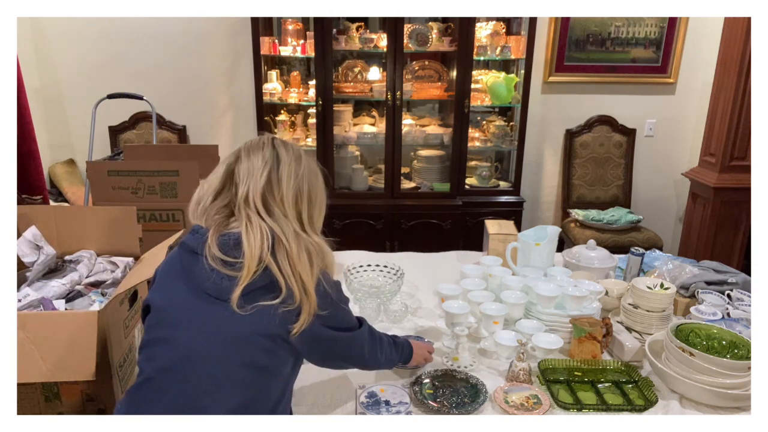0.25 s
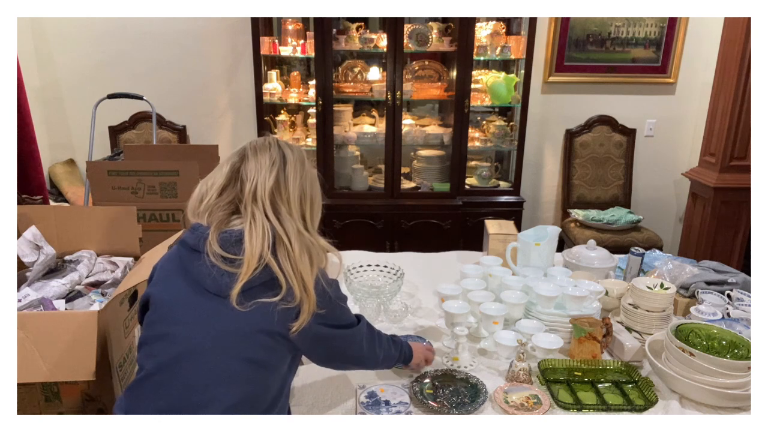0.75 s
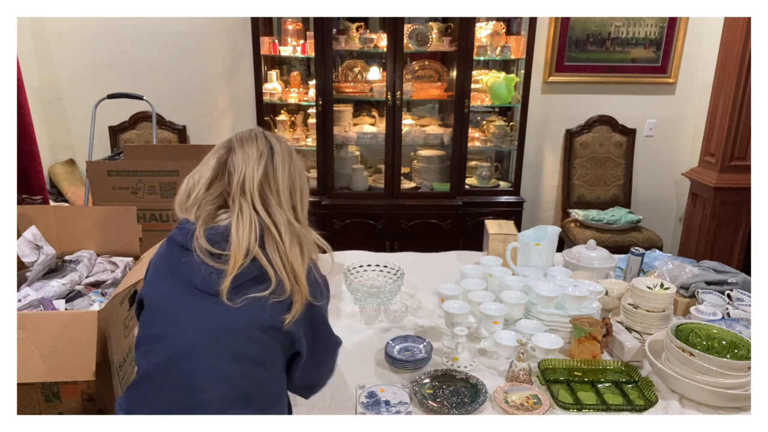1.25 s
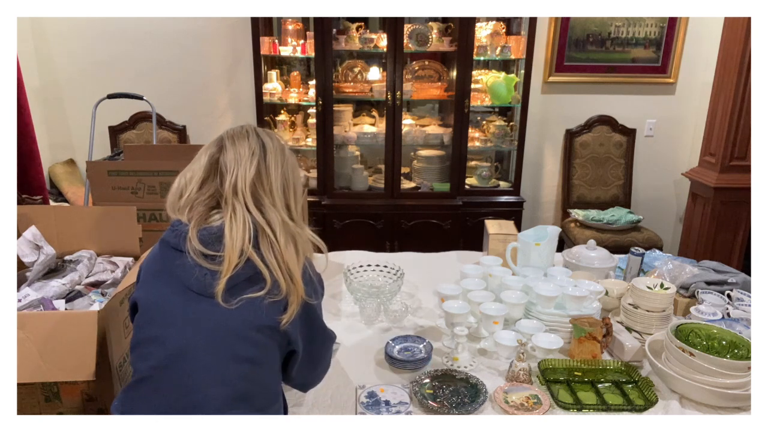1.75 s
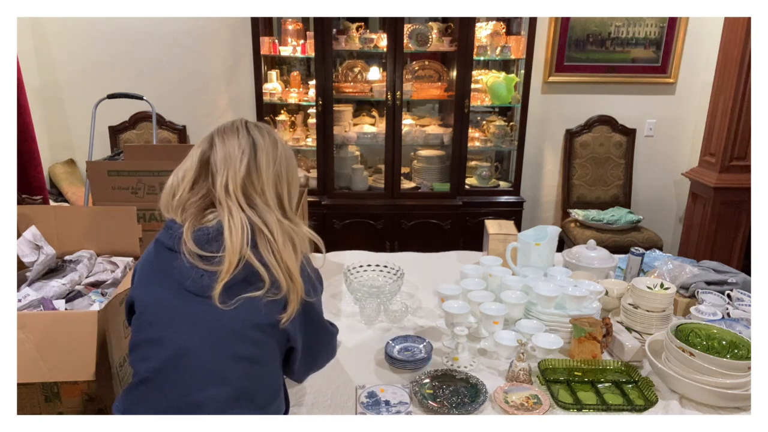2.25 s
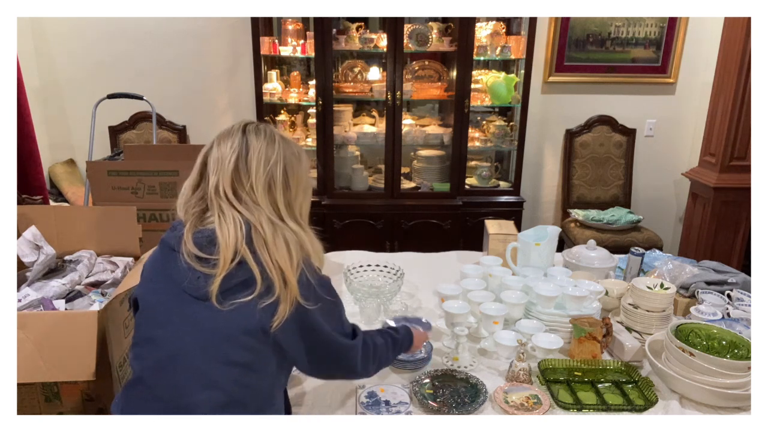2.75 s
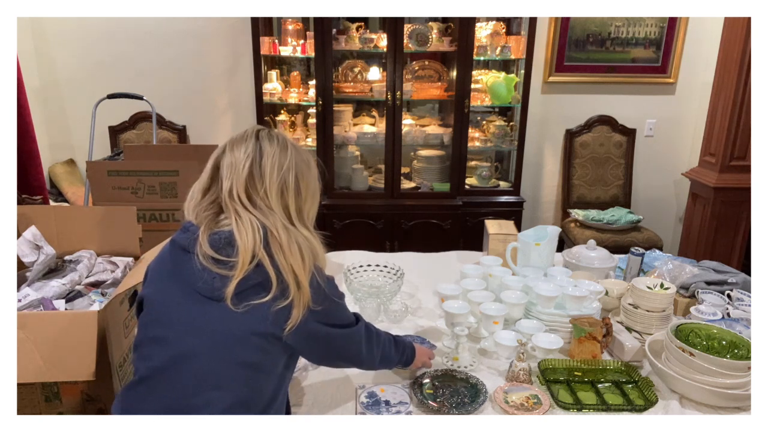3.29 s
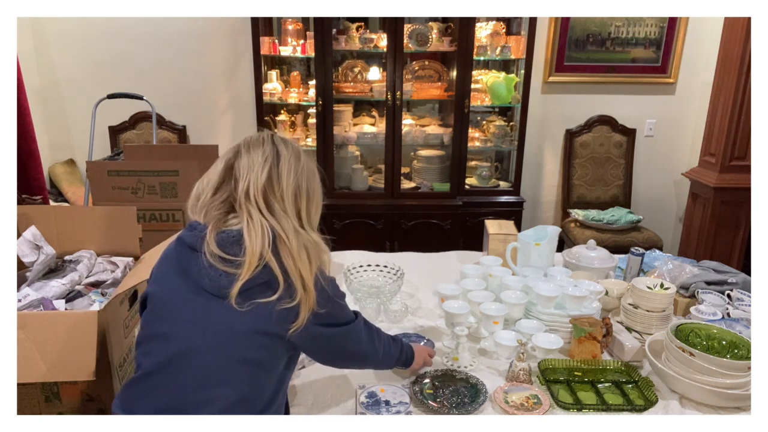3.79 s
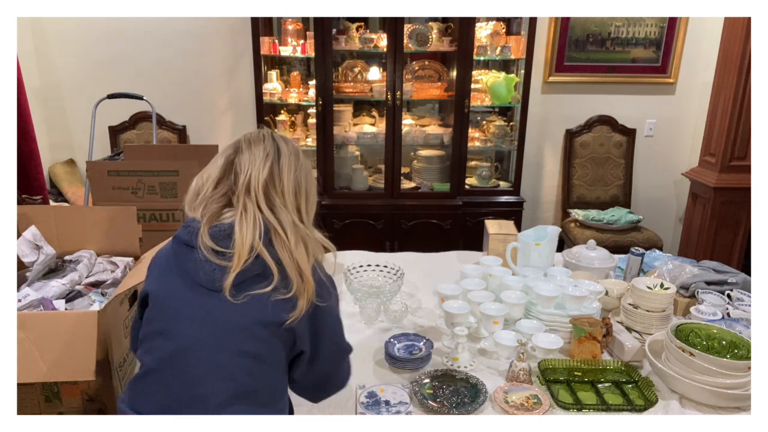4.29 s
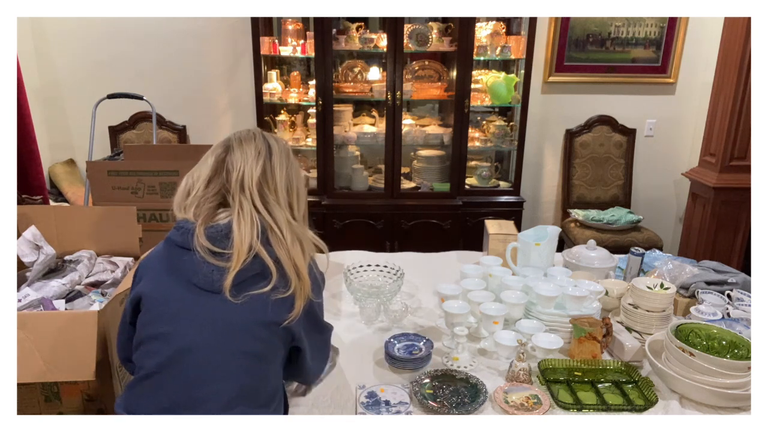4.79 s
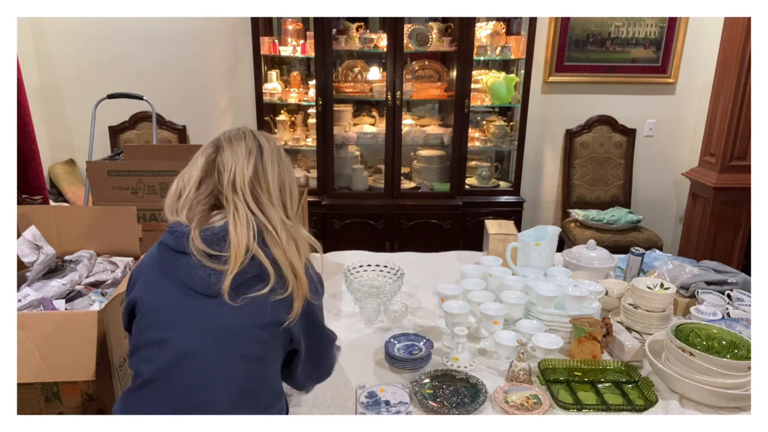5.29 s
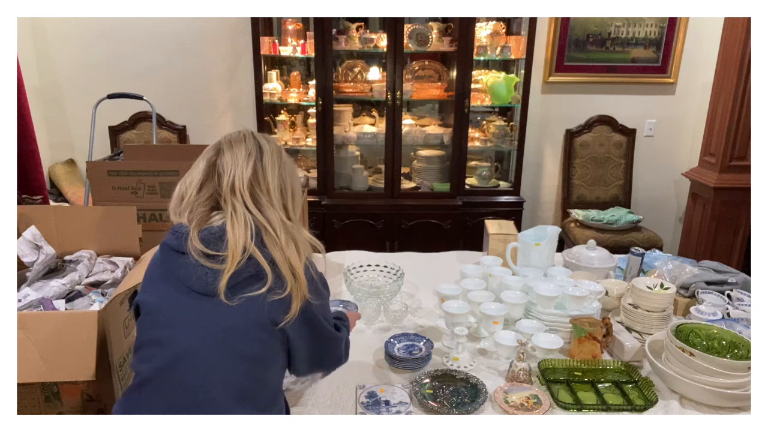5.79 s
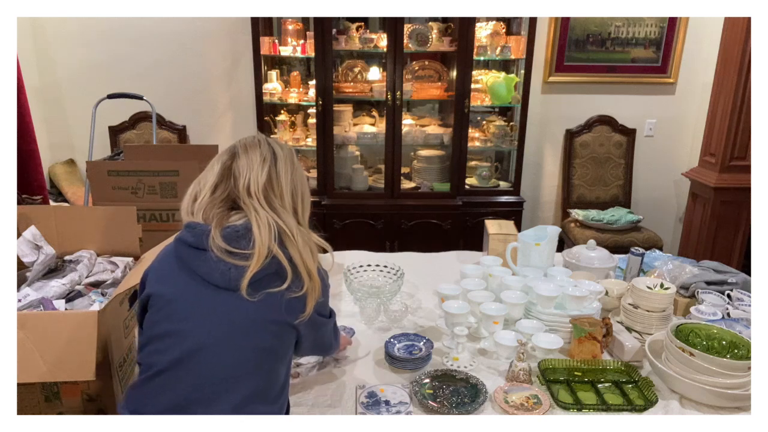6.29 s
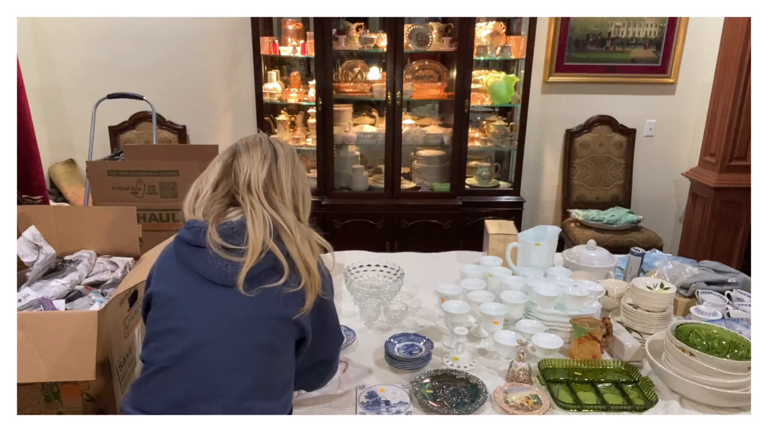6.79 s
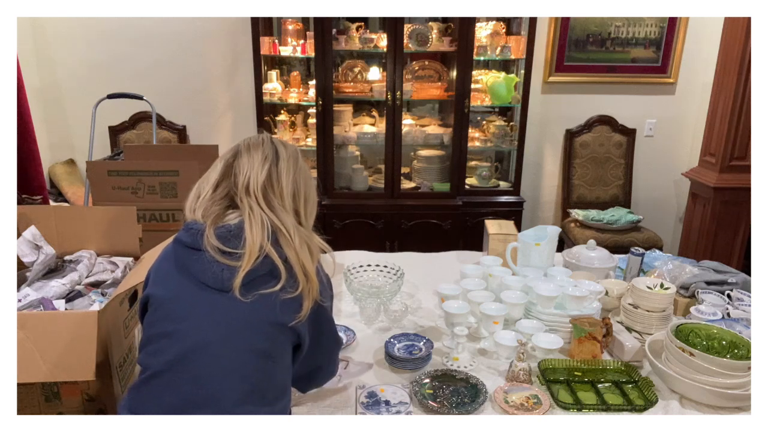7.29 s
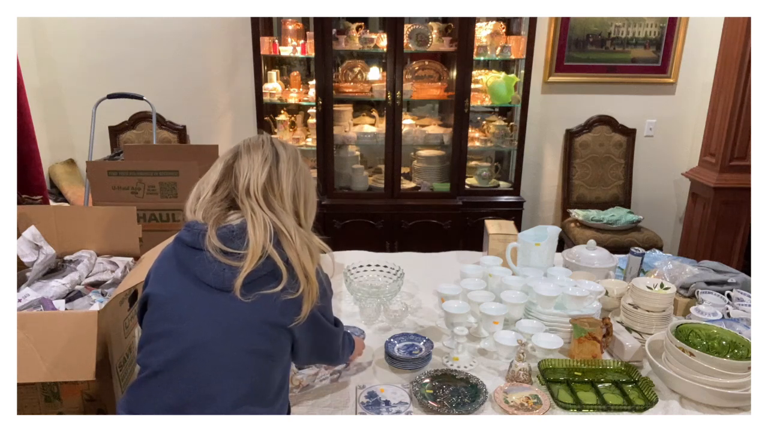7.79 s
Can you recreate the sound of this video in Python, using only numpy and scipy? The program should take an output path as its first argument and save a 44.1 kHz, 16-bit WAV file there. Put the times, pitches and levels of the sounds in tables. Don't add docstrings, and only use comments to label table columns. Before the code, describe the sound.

A hard, bright clink of small china bowls opens, bouncing and rocking to rest within half a second. Newspaper rustles and snaps, thinning to near quiet around two and a half seconds. Softer, damped bowl knocks come between three and four seconds, then steadier paper crackle with quiet floor thuds. A gritty ceramic scrape closes. A few metres from a small stereo recorder in a furnished room, with low engine hum outside.

```python
import sys
import numpy as np
from scipy import signal
from scipy.fft import rfft, irfft, next_fast_len
from scipy.io import wavfile

SR = 44100
rng = np.random.default_rng(int(sys.argv[2]) if len(sys.argv) > 2 else 0)


def pcm_store(signal):
    levels = np.round(np.clip(np.atleast_2d(signal), -1, 1) * 32767)
    wavfile.write(sys.argv[1], SR, levels.astype(np.int16).T)


def gain_from_decibels(decibels):
    exponent = np.asarray(decibels, float) / 20
    return 10 ** exponent


N = 355004


def rms_one(x):
    return x / np.sqrt(np.mean(np.square(x)) + 1e-20)


def in_time(rows):
    s, *columns = np.transpose(rows)
    return [np.interp(np.arange(N) / SR, s, c) for c in columns]


def at_hz(points, hz):
    table = np.array(points, float)
    return np.interp(np.log(hz + 1), np.log(table[:, 0] + 1), table[:, 1])


def coloured(x, points):
    hz = np.linspace(0, SR / 2, 1025)
    taps = signal.firwin2(2047, hz, gain_from_decibels(2 * at_hz(points, hz)), fs=SR)
    return signal.fftconvolve(x, signal.minimum_phase(taps))[:N]


def band(x, low_hz, high_hz):
    edges_hz = [low_hz, min(high_hz, .45 * SR)]
    return signal.sosfilt(signal.butter(2, edges_hz, "band", fs=SR, output="sos"), x)


def drift(rate):
    r = np.exp(-80 * np.pi * rate / SR)
    slow = signal.lfilter([1], [1, -2 * r, r * r], rng.standard_normal(N // 40 + 2002))[2000:]
    return np.interp(np.arange(N) / 40, np.arange(len(slow)), rms_one(slow))


def ring(clicks, hz, t60):
    r, w = gain_from_decibels(-60 / (t60 * SR)), 2 * np.pi * hz / SR
    return signal.lfilter([0, np.sin(w)], [1, -2 * r * np.cos(w), r * r], clicks + 1e-18)


def grains(per_s, spread_db, size=N):
    sizes = gain_from_decibels(spread_db * np.minimum(rng.exponential(1, size), 5)) * rng.choice([-1, 1], size)
    return sizes * (rng.random(size) < per_s / SR) / np.sqrt(per_s)


def clinks(hits, modes, level_db, tick_db, clatter_db, longest_s, clatter_s=0.16):
    s, peak_db, hard_db = np.transpose(hits)
    start, size = round(s[0] * SR), round((s[-1] - s[0] + .6) * SR)
    at = np.round(s * SR).astype(int) - start
    luck_db = rng.normal(0, 2.5, (len(at), len(modes)))
    rattle = grains(2500, spread_db=2.0, size=size) * 50
    fading = gain_from_decibels(-60 / (clatter_s * SR))

    def blows(db):
        clicks = np.zeros(size)
        clicks[at] = gain_from_decibels(peak_db + db)
        return clicks, gain_from_decibels(clatter_db) * rattle * signal.lfilter([0, 1], [1, -fading], clicks)

    blow, clatter = blows(tick_db)
    sound = 0.28 * band(blow, 500, 9000)
    sound += 0.47 * band(clatter, 500, 5000)
    sound += 0.21 * band(clatter, 4600, 9000)
    sound += 0.12 * band(clatter, 9900, 16000)
    for k, (hz, db, t60) in enumerate(modes):
        blow, clatter = blows(db + level_db + hard_db * np.log2(hz / 2500) + luck_db[:, k])
        t60 = np.clip(t60, .02, longest_s)
        pair = ring(blow, hz, t60) + .5 * ring(blow, hz * 1.015, .6 * t60)
        damped = ring(blow + clatter, hz, .018)
        sound += (pair + damped) * (-1) ** k
    out = np.zeros(N)
    out[start:start + size] = band(band(sound, 670, 19000), 300, 19000)
    return out


# (time [s], peak level [dB], hardness of the high modes [dB per octave])
FIRST_HITS = [
    (0.0774, -37, -11),
    (0.1018, -3.5, -0.5),
    (0.1165, -13.5, 4.5),
    (0.1262, -12.5, -3),
    (0.1448, -23, 3),
    (0.189, -14, -5),
    (0.1965, -22.5, -1),
]
# (frequency [Hz], level [dB], T60 [s])
FIRST_MODES = [(1050, -16.5, 0.2), (1450, 0, 0.067), (1647, -7.5, 0.23), (2370, -3.5, 0.3),
               (2570, -7, 0.39), (2837, -1.5, 0.33), (3531, -29.5, 0.3), (3917, -3.5, 0.12),
               (4030, -8, 0.23), (4215, -10.5, 0.24), (4350, -23, 0.5), (5970, -1, 0.2), (5990, 0, 0.24),
               (5540, -21, 0.11), (6660, -22, 0.25), (6970, -14.5, 0.33), (7740, -22.5, 0.24),
               (8260, -27, 0.34), (8540, -9, 0.17), (10900, -32, 0.21), (7270, -23.5, 0.11),
               (11400, -15.5, 0.13), (12100, -25, 0.15), (12330, -38, 0.2)]


def first_stacking():
    return clinks(FIRST_HITS, FIRST_MODES, level_db=-19.0, tick_db=14.5, clatter_db=-11.0, longest_s=0.82)


# (time [s], peak level [dB], hardness [dB per octave])
SECOND_HITS = [
    (3.3112, -21.5, 0),
    (3.3178, -25.5, 2.2),
    (3.3345, -33, 0.82),
]
# (frequency [Hz], level [dB], T60 [s])
SECOND_MODES = [(960, -27.5, 0.5), (1657, -1.5, 0.081), (2480, -17, 0.43), (2630, -23, 1.4),
                (2713, -50, 5.0), (2860, -26, 0.21), (4300, -36, 1.3), (4253, -28, 5.0), (4700, -27, 0.2),
                (6160, -21, 0.67), (3170, -25, 0.1), (7900, -31, 0.22), (11200, -25, 0.1), (8600, -38, 0.1)]


def second_stacking():
    return clinks(SECOND_HITS, SECOND_MODES, level_db=-7.5, tick_db=12.5, clatter_db=-8.0,
                  longest_s=0.033, clatter_s=0.14)


# (time [s], peak level [dB], hardness [dB per octave])
ROCKING_HITS = [
    (0.2782, -19, 0.058),
    (0.2845, -18, 1.6),
]
# (frequency [Hz], level [dB], T60 [s])
ROCKING_MODES = [(1660, 1, 0.03), (1790, -0.5, 0.019), (2470, -8.5, 0.042), (2700, -14.5, 0.2),
                 (3925, -4, 0.22), (4380, -8, 0.03), (5620, -24.5, 0.21), (5870, -9, 0.25),
                 (6550, -22.5, 0.1), (6700, -22, 0.12), (7630, -22, 0.15), (8740, -11.5, 0.051),
                 (11570, -22, 0.1), (13440, -26.5, 0.08)]
# (time [s], peak level [dB], hardness [dB per octave])
RESTING_HITS = [
    (0.3313, -20.5, -0.5),
    (0.3372, -18.5, -9),
    (0.341, -29, -5),
    (0.3555, -28, 1.5),
    (0.3625, -32, 0),
    (0.3685, -32.5, -7),
    (0.379, -45, 2.5),
]
# (frequency [Hz], level [dB], T60 [s])
RESTING_MODES = [(1415, -15, 0.04), (1660, -8, 0.031), (2430, -15.5, 0.085), (2692, -10, 0.082),
                 (4000, -22.5, 0.084), (4630, -14.5, 0.065), (5830, -10, 0.17), (5950, -11, 0.3),
                 (6720, -15.5, 0.15), (7600, -11, 0.15), (8660, -8.5, 0.061), (11000, -20, 0.17),
                 (12420, -32.5, 0.15), (13510, -31.5, 0.15)]


def settling_bowl():
    rocking = clinks(ROCKING_HITS, ROCKING_MODES, level_db=-10.5, tick_db=9.0, clatter_db=-9.0,
                     longest_s=0.36, clatter_s=0.048)
    return rocking + clinks(RESTING_HITS, RESTING_MODES, level_db=-7.5, tick_db=7.5, clatter_db=-5.5,
                            longest_s=0.3, clatter_s=0.11)


# (time [s], peak level [dB], hardness [dB per octave])
TIPPING_HITS = [
    (3.3545, -27.5, 0),
    (3.3595, -36, 0),
    (3.368, -34.5, 0),
    (3.372, -42, 0),
]
# (frequency [Hz], level [dB], T60 [s])
TIPPED_MODES = [(1000, -9.5, 0.03), (1660, -11, 0.06), (2810, -8, 0.074), (3160, -13, 0.068),
                (4180, -15, 0.04), (6300, -14, 0.04), (7940, -24, 0.05), (11440, -26, 0.06)]
# (time [s], peak level [dB], hardness [dB per octave])
HELD_HITS = [
    (3.1495, -30.5, 0),
    (3.178, -28, 0),
    (3.19, -39, 0),
    (3.2035, -29.5, 0),
    (3.2197, -43, 0),
    (3.6085, -33, 0),
    (3.6283, -29.5, 0),
    (3.6776, -30.5, 0.0047),
]
# (frequency [Hz], level [dB], T60 [s])
HELD_MODES = [(836, -10, 5.0), (1120, -7.5, 0.4), (1465, -3.5, 5.0), (1650, -2, 5.0), (2520, -6, 0.38),
              (3260, -32, 5.0), (4500, -26, 0.23)]
# (time [s], peak level [dB], hardness [dB per octave])
THIRD_HITS = [
    (3.8855, -21.5, 0),
    (3.895, -37, 0.0057),
]
# (frequency [Hz], level [dB], T60 [s])
THIRD_MODES = [(1435, 1, 0.21), (1676, -3, 0.13), (2450, -1.5, 0.13), (3030, -13, 0.72), (3140, -28, 5.0),
               (3190, -3, 0.19), (3930, -26, 0.34), (5160, -28, 5.0), (6370, -14, 0.26), (7510, -37, 0.18),
               (7950, -7, 0.05), (8450, -33, 5.0)]


def handled_bowls():
    sound = clinks(TIPPING_HITS, TIPPED_MODES, level_db=-9.0, tick_db=9.5, clatter_db=-5.5,
                   longest_s=0.12, clatter_s=0.079)
    sound += clinks(HELD_HITS, HELD_MODES, level_db=-15.5, tick_db=-0.5, clatter_db=-3.0, longest_s=0.042)
    sound += clinks(THIRD_HITS, THIRD_MODES, level_db=-17.5, tick_db=15.0, clatter_db=-8.5, longest_s=0.13)
    return sound


# (time [s], level [dB], hardness [dB])
SLIDE_STROKES = [
    [(7.79, -49, 3), (7.803, -31.5, -15), (7.831, -18, -12), (7.834, -16.5, -12.5), (7.879, -18.5, -3.5),
     (7.884, -29, 3.5)],
    [(7.91, -33, -1), (7.948, -24.5, -11), (7.98, -17, -14), (7.998, -27.5, -4.5), (8.05, -34, -14.5)],
]
# (time [s], peak level [dB])
JOLTS = [(7.8021, -13.5), (7.8137, -11), (7.8321, 0), (7.8414, 1), (7.8548, -1), (7.8687, -2.5),
         (7.861, -1), (7.8745, -15), (7.8803, -10), (7.9568, -15), (7.9699, -13), (7.9822, -25),
         (7.987, -26), (8.004, -16)]
# (frequency [Hz], width [Hz], level [dB], change on the second stroke [dB])
SLIDING_MODES = [(861, 30, -11, -8), (1370, 34, 1.5, -2), (1557, 26, 3.5, -11.5), (1730, 46, -8, -9),
                 (2332, 32, 0, 3.5), (2432, 44, -1.5, -7.5), (3080, 140, -13, -2.5), (3570, 44, -8, 1.5),
                 (3790, 45, -4.5, -7.5), (4600, 52, -14, 2.5), (4820, 37, -9, 0), (5180, 30, -15, 0),
                 (5910, 37, -10, 5), (6050, 21, -12, 3.5), (6360, 15, -10.5, -1), (6520, 38, -8.5, -2.5),
                 (7100, 29, -17.5, -2), (1190, 62, -20.5, 19), (8080, 40, -15.5, 0), (8530, 110, -16, -6),
                 (9100, 22, -22, 2), (2830, 17, -12, -4), (10970, 20, -14.5, -5.5), (3450, 19, -10.5, 10),
                 (12400, 55, -22, -5), (12800, 31, -21, -4), (13240, 90, -28.5, -8), (2590, 26, -11, 11),
                 (1040, 24, -13.5, 8)]


def slide():
    start = round(7.8 * SR)
    level_db, hard_db = (c[start:] for c in in_time(np.concatenate(SLIDE_STROKES)))
    size = N - start
    second_stroke = np.arange(start, N) > 7.93 * SR
    stutter = grains(4000, spread_db=1.5)[start:] * gain_from_decibels(level_db)
    jolts = np.zeros(size)
    for s, db in JOLTS:
        jolts[round(s * SR) - start] = gain_from_decibels(db - 33.5)
    sound = gain_from_decibels(39.0) * band(stutter + jolts, 900, 8400)
    for k, (hz, width, db, later_db) in enumerate(SLIDING_MODES):
        push = stutter * rng.normal(1, 1.0, size) + jolts
        if hz > 3200:
            push = push * gain_from_decibels(hard_db + 9.0)
        wander_db = np.interp(np.arange(size), np.linspace(0, size, 24), rng.normal(0, 2.5, 24))
        push = push * gain_from_decibels(wander_db + later_db * second_stroke)
        sign = (-1) ** k
        sound += ring(push, hz, 2.0 / max(width, 5)) * gain_from_decibels(db) * width * sign
        if hz < 9000:
            sound += ring(push, hz, 0.007) * gain_from_decibels(db + 3.0) * width * sign
    table_top = gain_from_decibels(-31.5) * rms_one(band(stutter + jolts, 153, 400))
    bowl = band(band(rms_one(sound), 650, 15000), 330, 15000)
    out = np.zeros(N)
    out[start:] = (bowl + table_top) * np.sqrt(np.mean(gain_from_decibels(2 * level_db))) * gain_from_decibels(-2.0)
    return out


# (time [s], hold [s], crumpling level [dB], sheet flap relative level [dB], crispness
# relative level [dB])
PAPER_TUGS = [(0.127, 0.31, -43, -7, -3), (0.423, 0.13, -46, -4, -1.5), (0.672, 0.051, -44, 0, -0.5),
              (0.856, 0, -37, -2.5, -0.4), (0.967, 0.079, -45, -2.5, 0.3), (1.214, 0.091, -40, -1, 0.3),
              (1.35, 0.19, -46, -3.5, 0), (1.542, 0.12, -45, -2, -1), (1.698, 0.0021, -41, -1, 1),
              (1.864, 0.072, -52.5, -3.5, 0), (2.058, 0, -49.5, -3, 0.2), (2.23, 0.019, -54, -3, -1),
              (2.524, 0.062, -64, -3.3, 1.5), (2.828, 0.04, -53, -1, 0), (2.992, 0.059, -48.5, -4.5, 0),
              (3.151, 0.098, -51.5, 0.5, 0.5), (3.35, 0.19, -49.5, -2.5, -0.5),
              (3.623, 0.067, -47.5, -3, -1),
              (3.884, 0.093, -49.5, -2, -2), (4.053, 0.059, -48.5, -0.5, 0), (4.247, 0.2, -42, -3, 1),
               (4.41, 0.038, -44, -7, -0.5), (4.515, 0.029, -45, -0.5, -0.5),
               (4.614, 0.036, -44.5, -2.5, 1), (4.72, 0.024, -42.5, -1, 0.5), (4.999, 0.079, -47.5, -4, -1),
               (5.15, 0.074, -47.5, -2.5, -0.5), (5.375, 0.04, -49, -2, 1), (5.566, 0.17, -49, -1.5, 0.1),
               (5.777, 0.031, -45, -2.5, 0.5), (5.871, 0.037, -44, -5, 2), (6.018, 0.078, -47, -0.5, -1.9),
               (6.19, 0.068, -47.5, -3.5, 1), (6.39, 0.049, -50.5, -3.5, 0.5), (6.562, 0.0056, -52, -2, -1),
               (6.68, 0.052, -47, 1.5, 0), (6.794, 0.061, -49.5, -5.5, 1), (6.999, 0.024, -45.5, -2.5, 1),
               (7.114, 0.15, -51, -2.5, 0), (7.434, 0.1, -57.5, 0.1, -0.5), (7.586, 0.13, -50.5, -2, -0.5),
               (7.688, 0.11, -50.5, -3, 2)]


def tugs():
    rise_db_per_s, fall_db_per_s, paper_db = 149.5, 124, 3.5
    power, t = 0, np.arange(0, N + 40, 40) / SR
    for s, hold, db, flap_db, crisp_db in PAPER_TUGS:
        away_db = rise_db_per_s * np.maximum(s - t, 0) + fall_db_per_s * np.maximum(t - s - hold, 0)
        parts_db = np.array([[0], [flap_db], [crisp_db]])
        power = power + gain_from_decibels(2 * (paper_db + db - away_db + parts_db))
    return [np.interp(np.arange(N) / SR, t, np.sqrt(part)) for part in power]


# (frequency [Hz], level [dB per Hz])
PAPER_SPECTRUM = [(120, -5.5), (250, -3.5), (520, 6), (720, 9), (900, 10), (1700, -8.5), (2500, -5),
                  (4000, -1.5), (6000, -9), (8000, -14), (10000, -17), (13000, -21), (16000, -27)]
# (frequency [Hz], width [Hz], level [dB])
ROOM_MODES = [(543, 53, 2.5), (867, 126, 0)]


def paper():
    crumple_gain, flap_gain, crisp_gain = tugs()
    clumps = gain_from_decibels(0.93 * drift(5.2) + 0.83 * drift(11))
    ends = [coloured(grains(2600, spread_db=1.0) * clumps, PAPER_SPECTRUM) for end in range(2)]
    crackle = np.array(ends)
    answer = sum(ring(crackle, hz, 4.3 / max(width, 8)) * gain_from_decibels(db) * width for hz, width, db in ROOM_MODES)
    crackle = crackle + gain_from_decibels(-11.0) * np.std(crackle) * rms_one(answer)
    flap = rms_one(band(crackle, 130, 980)) * gain_from_decibels(2 * drift(12))
    body = rms_one(band(crackle, 1262, 3140)) * gain_from_decibels(1.2 * drift(24))
    crisp = rms_one(band(crackle, 3890, 18000)) * gain_from_decibels(-4.5 + 1.0 * drift(23))
    return flap_gain * flap + crumple_gain * body + crisp_gain * crisp


# (time [s], peak level [dB], pitch [Hz])
FOLD_SNAPS = [(0.504, -29, 840), (0.843, -33, 457), (0.953, -29, 537), (1.009, -40, 860),
              (1.144, -43.5, 1040), (1.262, -31.5, 1330), (1.679, -31, 2230), (1.837, -49, 1050),
              (1.894, -45.5, 1530), (2.067, -43.5, 1340), (2.209, -46.5, 1082), (2.76, -53.5, 773),
              (2.846, -46, 1996), (2.98, -39, 861), (4.169, -38, 958), (4.507, -36.5, 1210),
              (4.607, -36.5, 1660), (4.64, -41, 1060), (5.503, -40.5, 770), (5.625, -40, 1080),
              (5.888, -38, 800), (6.056, -39, 870), (6.634, -41, 778), (6.905, -42.5, 1120),
              (6.993, -48.5, 530), (7.05, -40, 840), (7.437, -47, 1340), (7.7, -37.5, 640)]


def snaps():
    out, age = np.zeros(N), np.arange(4000) / SR
    for s, db, hz in FOLD_SNAPS:
        at = round(s * SR)
        burst = rng.standard_normal(len(age)) * np.minimum(age / .001, 1) * gain_from_decibels(-60 * age / .06)
        crack = gain_from_decibels(-27.5) * rms_one(band(burst, 0.97 * hz, 9000))
        out[at:at + len(age)] += gain_from_decibels(db - 14.5) * (rms_one(band(burst, 0.53 * hz, 1.44 * hz)) + crack)
    return out


# (time [s], peak level [dB], T60 [s])
CREASE_TEARS = [(0.86, -37.5, .1), (1.22, -48, .1), (1.526, -42, 0.089), (1.689, -36.5, .08),
                (2.067, -49, .06), (2.2079, -60, .08), (2.756, -55, .1), (2.974, -47.5, .06),
                (3.4506, -40.5, .15), (3.469, -38, .1), (3.6008, -54, .08), (3.8404, -63, .08),
                (4.235, -41.5, .1), (4.6347, -35, 0.078), (4.9762, -53, .08), (5.1696, -43, .05),
                (5.343, -49, .1), (5.627, -54.5, 0.066), (5.8857, -29.5, 0.13), (6.21, -44, .08),
                (6.3, -39.5, 0.16), (6.636, -55, 0.071), (6.9407, -50.5, .06), (6.96, -41.5, 0.1),
                (7.6986, -32, 0.28)]


def creases():
    out, age = np.zeros(N), np.arange(6000) / SR
    shape = (len(CREASE_TEARS), len(age))
    spray = rng.standard_normal(shape) * gain_from_decibels(3.3 * rng.standard_normal(shape))
    for (s, db, t60), noise in zip(CREASE_TEARS, spray):
        at = round(s * SR)
        bright = rms_one(band(noise, 4500, 15000)) + gain_from_decibels(-5.5) * rms_one(band(noise, 1400, 4500))
        out[at:at + len(age)] += gain_from_decibels(db - 9 - 60 * age / np.clip(t60, .02, .3)) * bright
    return out


# (time [s], hum level [dB])
ENGINE_HUM = [
    (0.0, -50.5),
    (1.66, -52.5),
    (1.84, -55),
    (2.35, -55),
    (2.62, -52.5),
    (3.94, -55.5),
    (4.69, -52.5),
    (5.04, -58),
    (7.44, -75),
    (8.05, -64),
]
# (time [s], peak level [dB], frequency [Hz])
FLOOR_THUDS = [
    (5.099, -42, 110),
    (5.3, -38.5, 99),
    (5.531, -37, 75),
    (5.601, -41.5, 133),
    (5.68, -42, 95),
    (6.475, -41.5, 157),
    (6.493, -31, 90),
    (6.52, -42, 70),
    (6.55, -40, 81),
    (6.591, -43, 101),
]


def rumble():
    hum_db, = in_time(ENGINE_HUM)
    deep_db = -57.5 + 0.34 * (hum_db + 47.5)
    white = rng.standard_normal((2, N))
    out = gain_from_decibels(hum_db + 5.5) * rms_one(band(ring(white[0], 91.3, 0.24), 57, 125))
    out += gain_from_decibels(deep_db) * rms_one(band(white[1], 48, 72))
    out += gain_from_decibels(deep_db - 7.0) * rms_one(band(band(white[0], 36, 48), 36, 60))
    for s, db, hz in FLOOR_THUDS:
        push, at = np.zeros(SR // 2), round(s * SR)
        push[0] = gain_from_decibels(db - 1.0)
        out[at:at + len(push)] += band(ring(push, hz, 0.15), 46, 230)
    return out


# (frequency [Hz], level [dB per Hz])
AIR_SPECTRUM = [(90, -4), (150, 2), (220, -7.5), (300, 2), (500, -22), (1000, -21), (2500, -36.5),
                (8000, -28.5), (12500, -33.5), (16000, -39)]
# (time [s], level [dB])
AIR_SWAY = [(0, -3.5), (2.3, -2.5), (2.4, 7), (2.47, 1), (2.55, 5), (2.6, 5.5), (2.65, 1), (2.69, -8),
            (2.725, 2), (2.76, 2), (8.05, -0.5)]


def still_air():
    sides = [coloured(rng.standard_normal(N), AIR_SPECTRUM) for side in range(2)]
    tone = gain_from_decibels(-57) * rms_one(sides)
    low = gain_from_decibels(0.25 * (in_time(ENGINE_HUM)[0] + 58.0)) * band(tone, 94, 475)
    return low + gain_from_decibels(in_time(AIR_SWAY)[0]) * band(tone, 344, 19000)


# (frequency [Hz], T60 [s])
REVERBERATION = [(100, 0.35), (1000, 0.39), (4000, 0.3), (12000, 0.11)]
# (frequency [Hz], left-right likeness [0-1])
PORT_LIKENESS = [(30, .9), (90, .96), (170, .86), (350, .84), (700, .25), (1600, .45), (3000, .3),
                 (4000, .1), (5800, .2), (7200, .8), (9500, .95), (16000, .95)]
# (frequency [Hz], left minus right [dB])
PORT_LEVEL = [(60, -0.5), (180, -2), (550, 0.5), (1650, -0.5), (4970, -2), (15000, 1)]
# (frequency [Hz], left lead [rad])
PORT_PHASE = [(0, -.1), (400, -.1), (700, .9), (3000, .7), (5500, 1.8), (6100, .1), (7350, 0),
              (16000, -9.9)]


def room(x, wet_db, gap_s, sideways, wide_db):
    size = SR // 2
    age, edges = np.arange(size) / SR, 40 * 2 ** np.arange(0, 9.1)
    white, tails = rng.standard_normal((2, size)), 0
    for low, high in zip(edges, edges[1:]):
        t60 = at_hz(REVERBERATION, np.sqrt(low * high))
        tails = tails + band(white, low, high) * gain_from_decibels(-60 * age / t60)
    tails = tails * np.clip(age / gap_s, 0, 1)
    tails = gain_from_decibels(wet_db) * tails / np.sqrt(np.sum(tails ** 2, axis=1, keepdims=True))
    tails[1] *= gain_from_decibels(wide_db)
    tails[0, 0] += 1
    length = next_fast_len(N + size)
    hz = np.arange(length // 2 + 1) * SR / length
    direct = [[0], [-1j * sideways]]
    paths = (rfft(tails, length) + direct) * rfft(x, length)
    shared, own = paths / np.sqrt(1 + gain_from_decibels(2 * wet_db))
    alike = at_hz(PORT_LIKENESS, hz)
    lead = np.interp(hz, *np.transpose(PORT_PHASE))
    port = np.sqrt(gain_from_decibels(at_hz(PORT_LEVEL, hz))) * np.exp(.5j * lead)
    mid, side = np.sqrt((1 + alike) / 2) * shared, np.sqrt((1 - alike) / 2) * own
    return irfft(np.array([(mid + side) * port, (mid - side) / port]), length)[:, :N]


def scene():
    china = first_stacking() + second_stacking() + settling_bowl() + handled_bowls() + slide()
    near = room(china, wet_db=-7, gap_s=0.0022, sideways=1.04, wide_db=7.5)
    around = paper() + snaps() + creases() + rumble() + still_air()
    return near + room(around, wet_db=-6.5, gap_s=0.0038, sideways=1, wide_db=4.5)


def low_pass(x):
    return signal.sosfilt(signal.butter(12, 15450, fs=SR, output="sos"), x)


# (time [s], level [dB])
HISS_GATE = [(0, 0), (2.36, -1), (2.46, -4), (2.54, -4.5), (2.62, 1.5), (2.68, -7), (2.715, -9), (2.76, 0),
             (3.76, 0.5), (3.82, -2.5), (3.87, 0), (8.05, 0.5)]


def record(dry):
    gated = dry + (gain_from_decibels(in_time(HISS_GATE)[0]) - 1) * band(dry, 206, 19000)
    mix = signal.sosfilt(signal.butter(2, 38, "high", fs=SR, output="sos"), gated)
    return low_pass(mix)


dry = scene()
out = record(dry)
pcm_store(out)
```